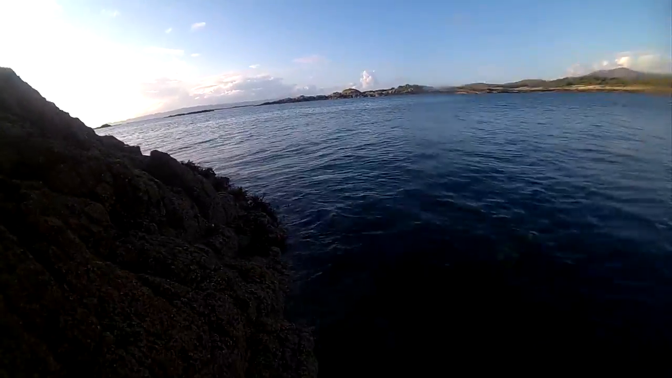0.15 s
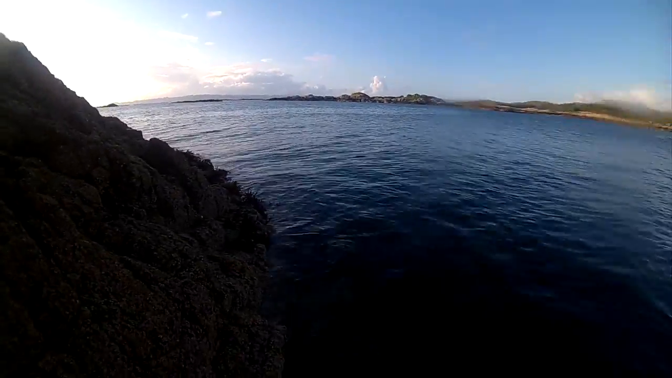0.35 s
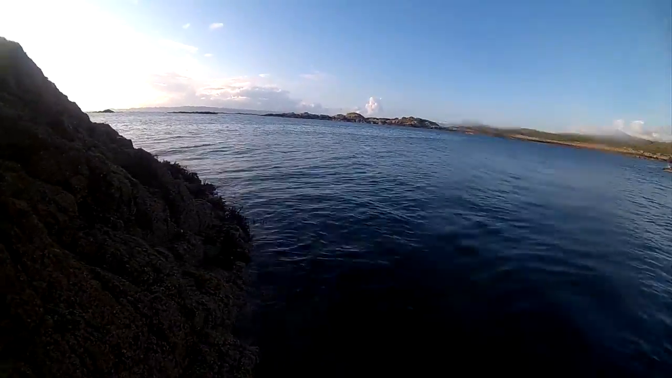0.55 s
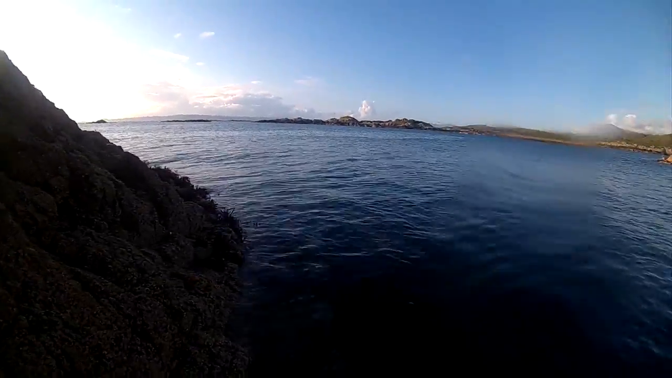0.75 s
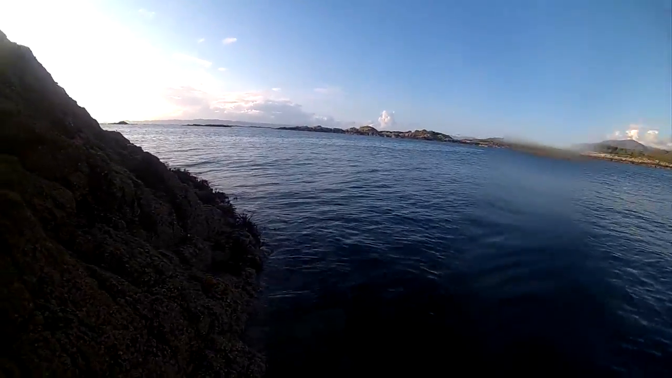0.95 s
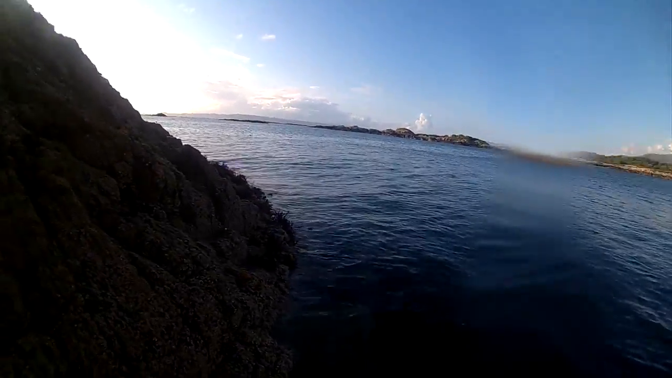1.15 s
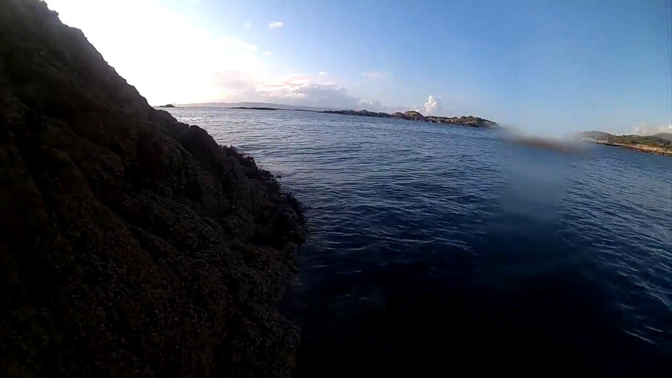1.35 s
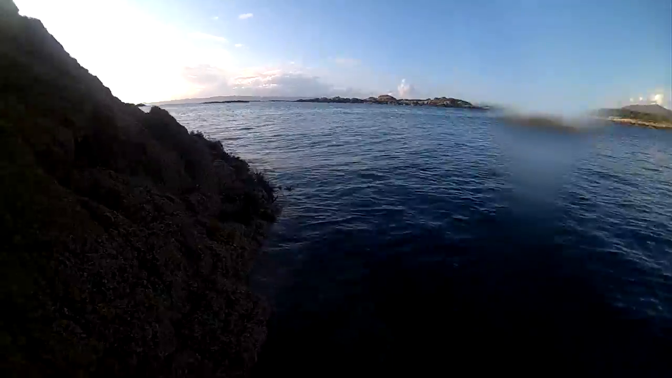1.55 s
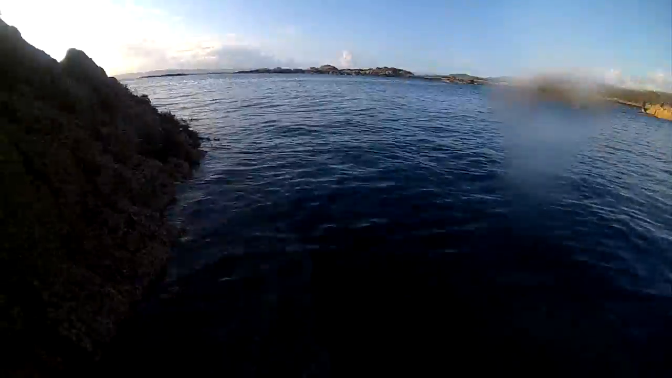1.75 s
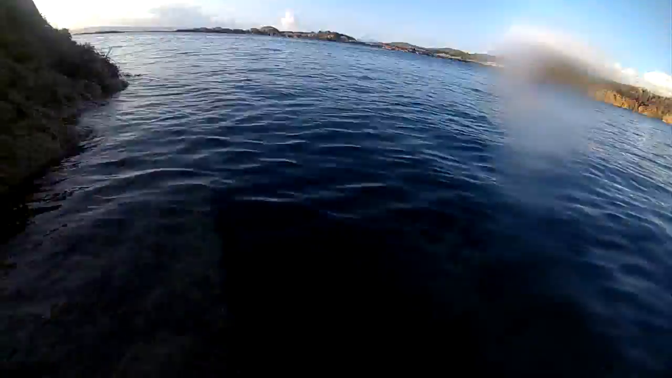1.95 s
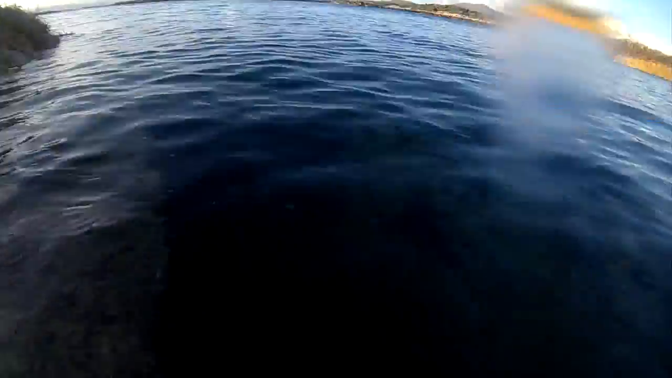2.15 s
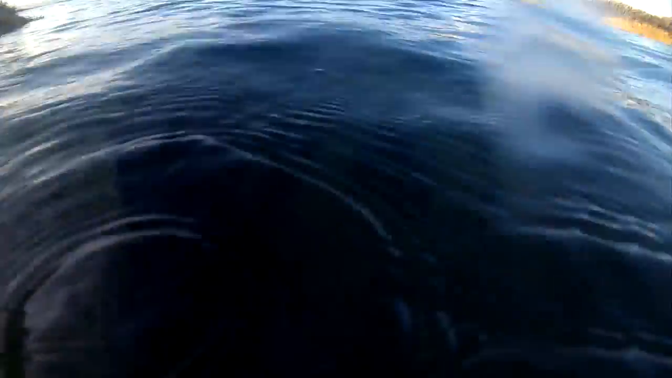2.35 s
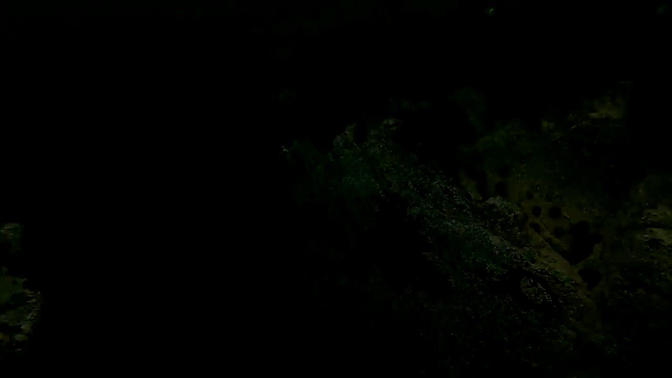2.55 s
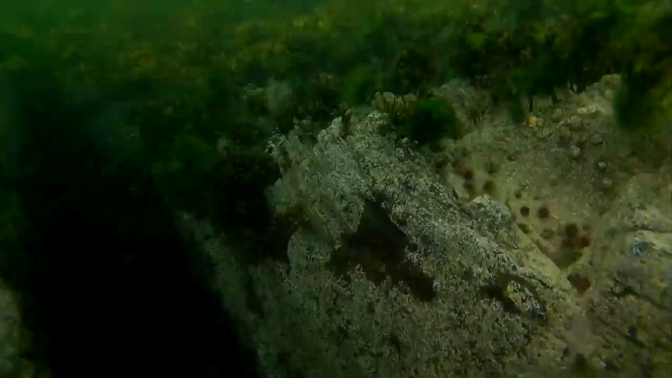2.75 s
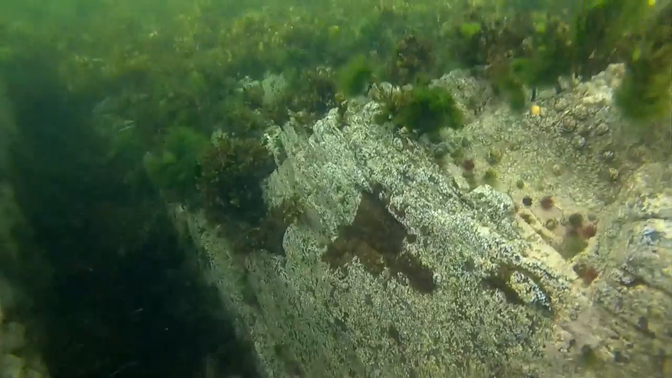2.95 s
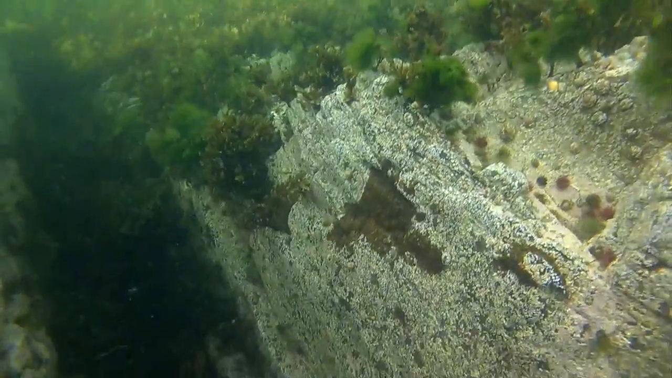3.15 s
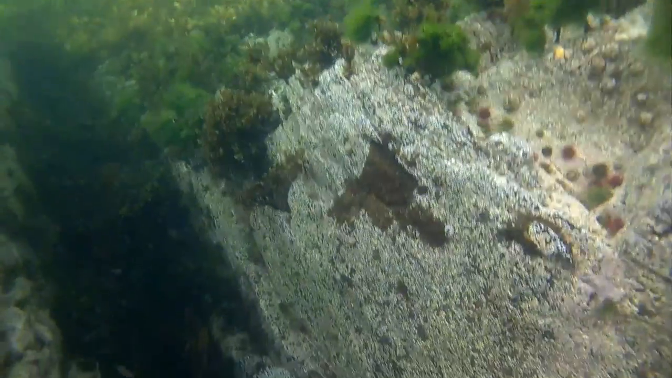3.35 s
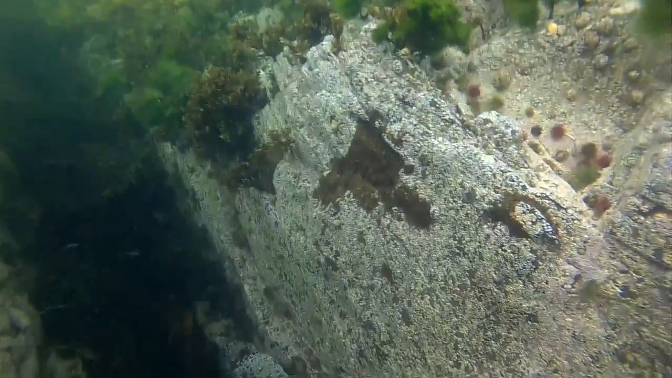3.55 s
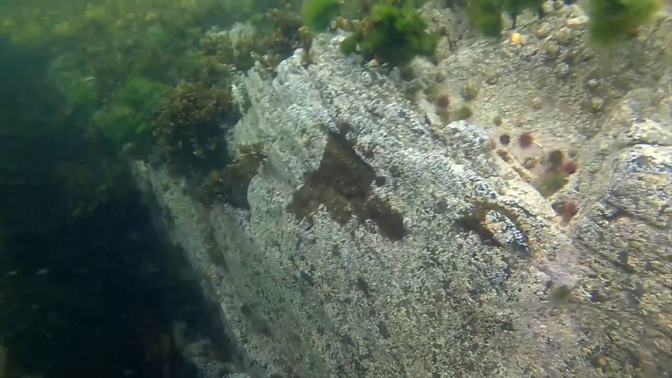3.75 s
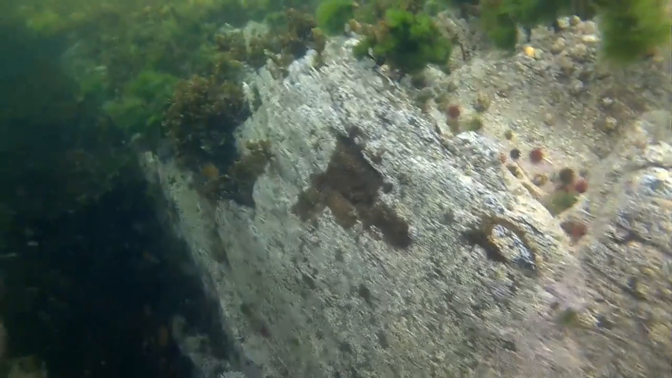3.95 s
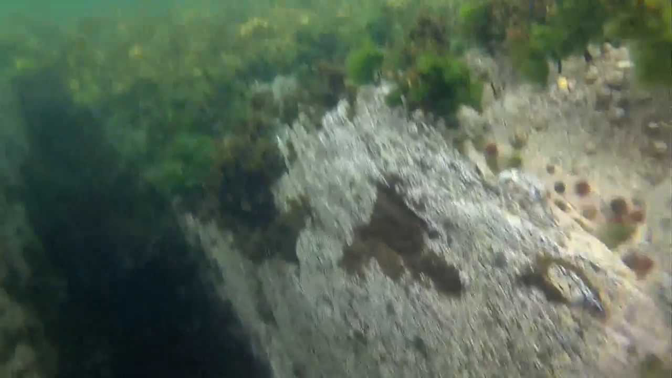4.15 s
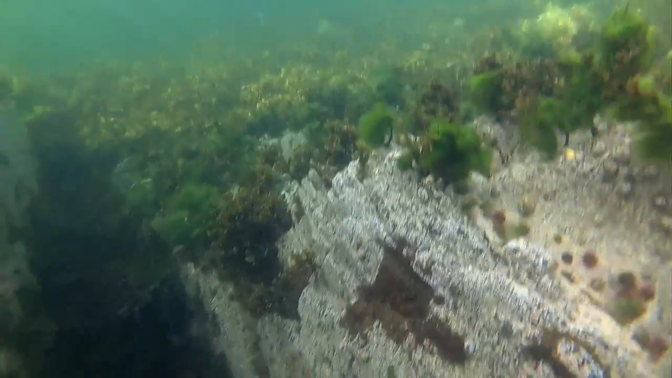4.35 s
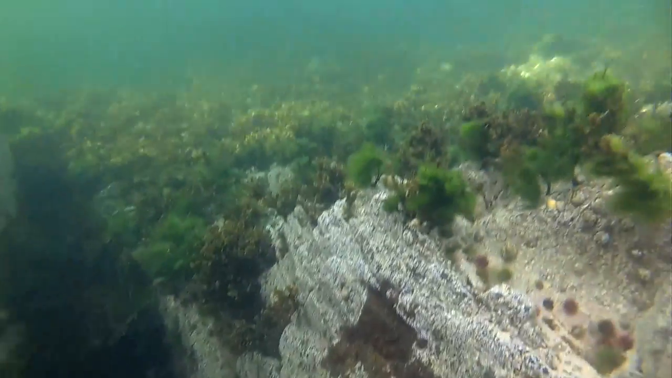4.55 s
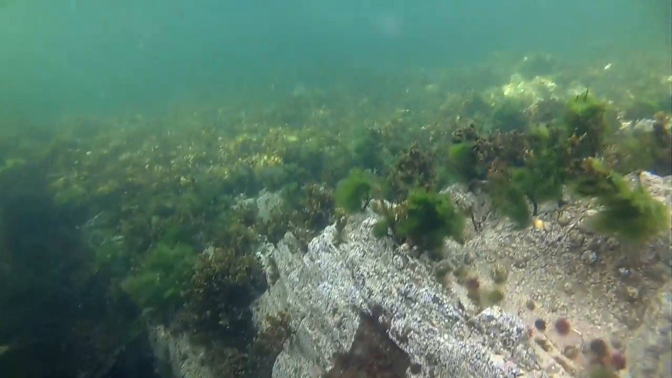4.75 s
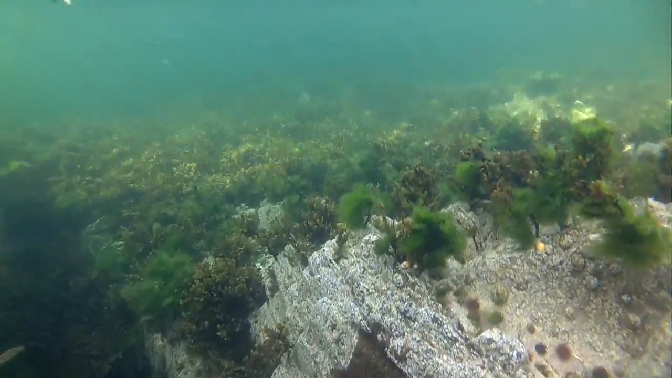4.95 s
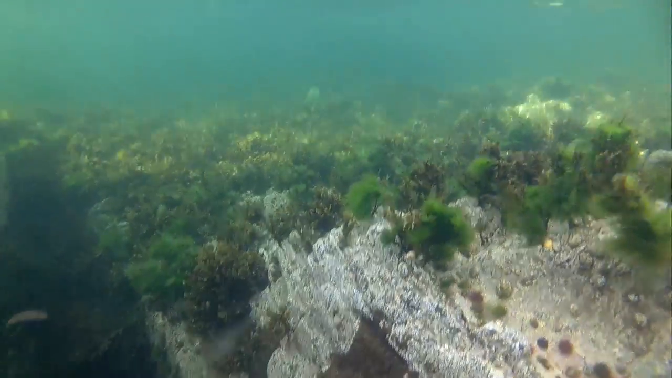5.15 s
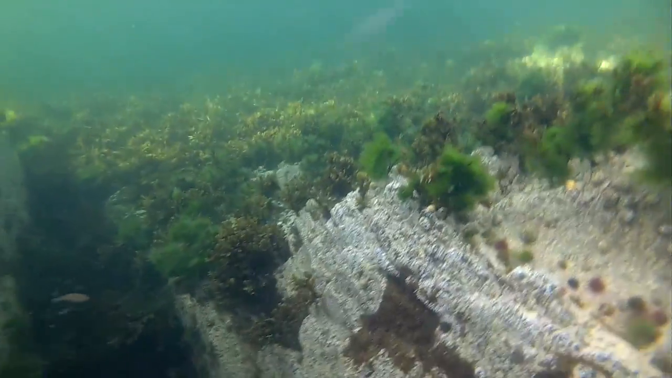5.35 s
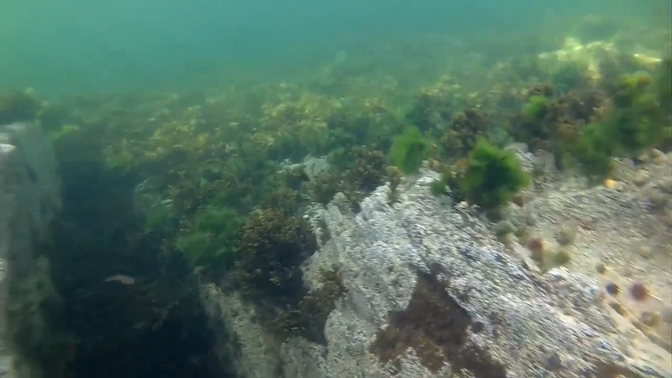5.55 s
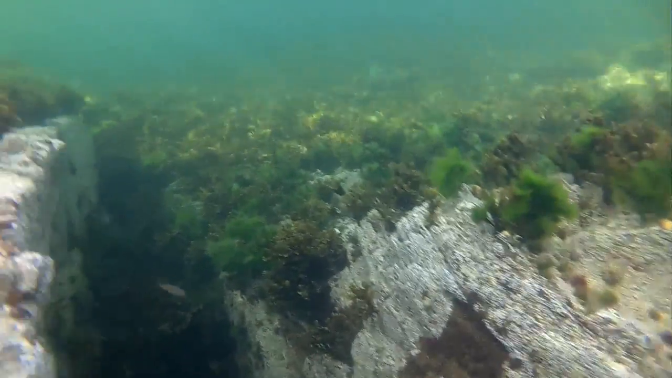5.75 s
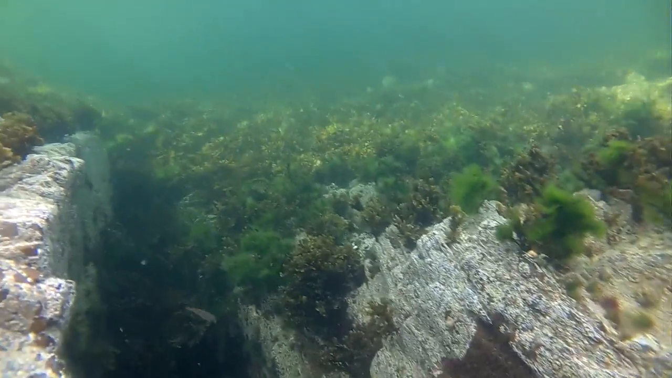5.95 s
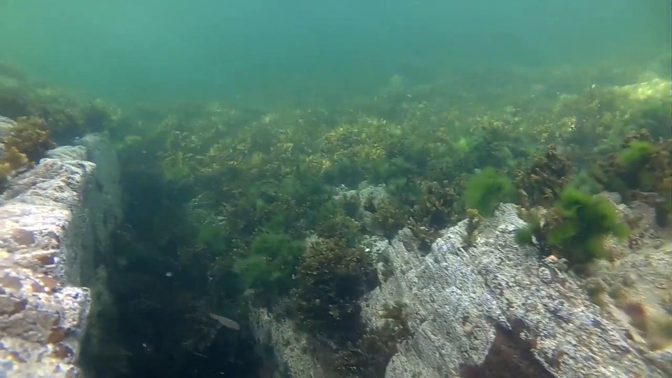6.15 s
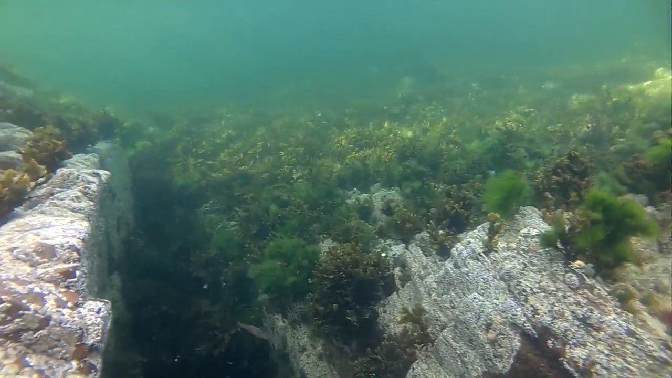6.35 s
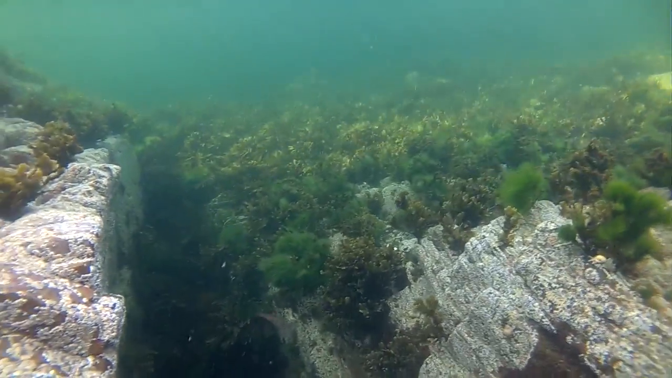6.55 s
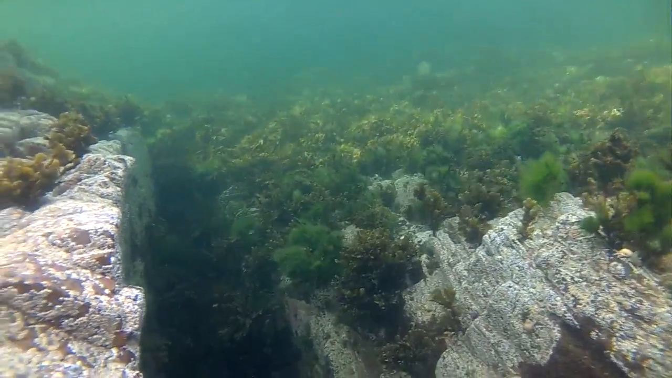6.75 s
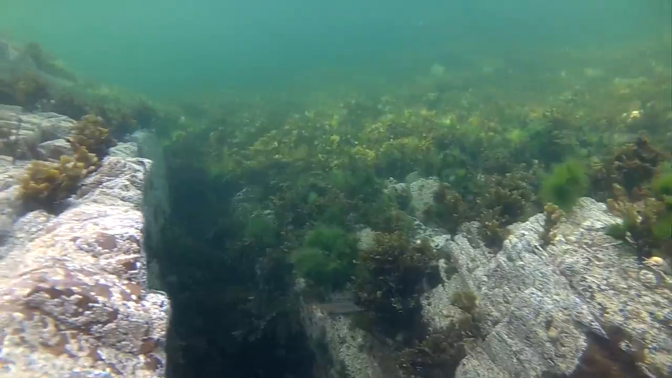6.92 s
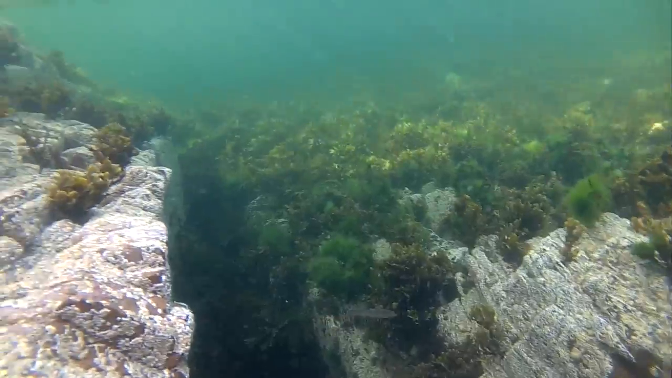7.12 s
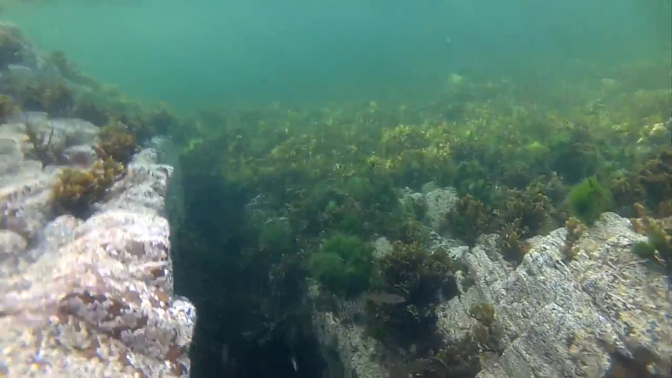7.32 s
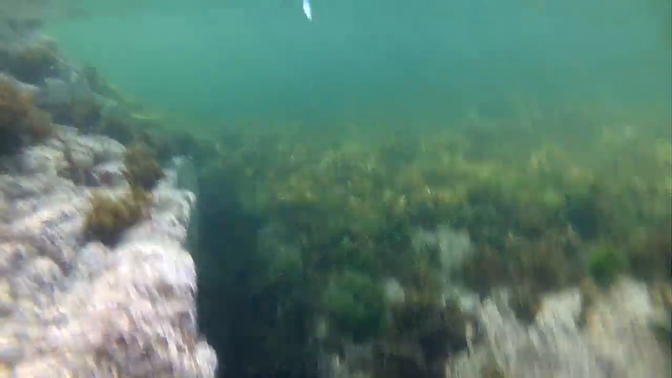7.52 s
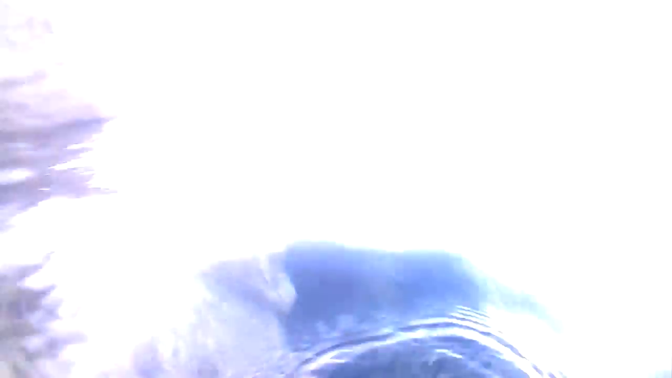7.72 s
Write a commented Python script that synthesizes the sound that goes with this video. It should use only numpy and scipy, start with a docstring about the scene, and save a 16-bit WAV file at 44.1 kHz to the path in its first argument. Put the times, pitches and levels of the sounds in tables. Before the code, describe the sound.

A camera in a plastic shell is dipped into the sea: soft taps, overloaded gulping slaps, hollow knocks and squeaky rubbing, then gurgling at surfacing.

```python
"""Bubbles ring and water slaps and churns round a small camera in a sealed plastic housing,
dipped into the sea by the rocks and lifted out again. Each bubble is a gliding tone, each slap a noise burst.
The hand taps the dry shell, then knocks, slips and rubs on the flooded one, which creaks: clicks ring its modes.
Behind this lie a murmur of drifting noise and, in air, a faint ticking of short pings.
The microphone inside hears it all muffled, and overloads on the loudest sounds."""
import sys
import numpy as np
from scipy import signal
from scipy.io import wavfile
from scipy.ndimage import uniform_filter1d

SR = 44100
rng = np.random.default_rng(int(sys.argv[2]) if len(sys.argv) > 2 else 0)


def generate_wav(signal):
    """Clip the signal to [-1, 1] and save it as 16-bit WAV at the path in sys.argv[1]."""
    frames = np.transpose(np.atleast_2d(signal))
    scaled = np.clip(frames, -1, 1) * 32767
    pcm = np.round(scaled).astype(np.int16)
    wavfile.write(sys.argv[1], SR, pcm)


N = 343098  # length in samples

# The tones of the shell under water. Each row: pitch in Hz, relative level in dB, time to die by 60 dB
# in seconds (before extra damping), relative level in dB when shaken at the grip.
FLOODED_SHELL = [(93, -24, 0.11, -43.5), (215, -10.5, 0.078, -30.5), (326.5, -18.5, 0.13, -46.5),
                 (508.7, -11, 0.14, -25.5), (608.6, -23.5, 0.16, -5), (667.5, 9, 0.031, 0.5),
                 (756, -9, 0.076, 3), (809, -16.5, 0.05, -9), (955, 3.5, 0.044, 0.5),
                 (1279, -8, 0.035, 1.5), (1352, 8, 0.016, 12), (1450, 3.5, 0.014, 15.5),
                 (1666, 0, 0.014, 12.5), (1950, -6.5, 0.016, 11.5), (2232, -15.5, 0.02, 2),
                 (2530, -9.5, 0.0073, 3.5), (2900, -24, 0.0043, -13.5), (3600, -28, 0.004, -20)]


def gain_of(db):
    """Turns decibels into a gain."""
    return 10 ** (np.asarray(db) / 20)


def evened(x):
    """Scales a signal to an rms (average strength) of 1."""
    return x / np.sqrt(np.mean(x ** 2) + 1e-20)


def read(points, hz):
    """Reads a spectrum between its points, on a log-frequency axis."""
    f, value = np.transpose(points)
    return np.interp(np.log(hz + 1), np.log(f + 1), value)


def add(mix, s, sound):
    """Adds a sound to the mix at a time in seconds."""
    part = mix[round(s * SR):][:len(sound)]
    part += sound[:len(part)]


def ring(hz, t60, rise_s, climb=0., settle_s=0.025):
    """A dying sine with a soft start; its pitch glides at first, then settles."""
    t = np.arange(int(1.8 * abs(t60) * SR) + 50) / SR
    glided = t + climb * settle_s * (t - settle_s * (1 - np.exp(-t / settle_s)))
    soft_start = (1 - np.exp(-t / abs(rise_s))) ** 2
    return np.sin(2 * np.pi * hz * glided) * soft_start * gain_of(-60 * t / abs(t60))


def strokes(rows, rise_db_per_s, fall_db_per_s):
    """Level in dB of gestures that swell, hold and fade; the loudest one counts."""
    t = np.arange(N) / SR
    levels = []
    for s, held, db in rows:
        swell_db = rise_db_per_s * np.maximum(s - t, 0)
        fade_db = fall_db_per_s * np.maximum(t - s - held, 0)
        levels.append(db - swell_db - fade_db)
    return np.max(levels, 0)


def bubbles(wobble=0.29):
    """Each pocket of air rings as one tone whose loudness wobbles as the pocket changes shape."""
    # Each row: start in seconds, level in dB, pitch in Hz, time to die by 60 dB in milliseconds,
    # first glide as a share of the pitch per second.
    pockets = [(2.096, -25, 580, 88, 1.5), (2.098, -20, 911, 91, 3), (2.119, -18.5, 1470, 17, -11.5),
               (2.145, -27.5, 3600, 66, -9), (2.148, -21.5, 850, 50, 7), (2.158, -0.5, 2080, 8.5, 6),
               (2.161, -13, 856, 66, 2), (2.16, -19, 1450, 61, -1), (2.181, -1.5, 1580, 14.8, 1.5),
               (2.186, -17, 563, 57, 1.5), (2.189, -20, 2080, 27, 6), (2.232, -22.5, 1950, 56, 1),
               (2.236, -27.5, 4400, 19, -4), (2.243, -17.5, 2126, 23, -3.5), (2.267, -14.5, 1700, 27, 12.5),
               (2.311, -30, 899, 62, 6.5), (2.324, 18.5, 1784, 6.7, 0.5), (2.334, -2.5, 3130, 11.4, 3),
               (2.335, -26, 620, 116, 10.5), (2.367, -15.5, 1345, 35, -1.5), (2.357, -19, 1837, 63, 3.5),
               (2.418, -25, 950, 16, 4.5), (2.43, -9, 2110, 13, 5), (2.436, -25, 933, 58, 3),
               (2.486, -11.5, 1094, 16.5, 46), (2.488, -11.5, 1398, 49, -0.5), (2.529, -39, 1020, 43, -7),
               (2.446, -31, 1950, 37, -8), (2.557, -17.5, 1155, 94, 5), (2.611, -46, 2436, 31, 1),
               (2.618, -27.5, 984, 20, -3.5), (2.653, -38.5, 1043, 61, 5), (2.681, -45, 988, 75, -2),
               (2.701, -21.5, 950, 5.3, 6), (2.737, -21, 968, 39, 0.5), (2.768, -28.5, 328, 81, -11.5),
               (2.78, -19, 993, 47, 1.5), (2.781, -21, 774, 51, 1), (2.825, -21.5, 763, 56, 2.5),
               (2.829, -29.5, 1257, 47, 7), (3.646, -18, 934, 53, -1.5), (3.646, -21.5, 1335, 38, 6),
               (3.647, -20.5, 720, 48, 9), (3.915, -13, 955, 23, 0.5), (3.918, -25.5, 1110, 66, 6.5),
               (6.052, -48.5, 959, 81, 0), (6.361, -48.5, 930, 52, 1), (2.108, -23, 4150, 30, -3.5),
               (7.381, -24.5, 1080, 13, -18), (7.413, -37.5, 2000, 17, 5), (7.415, -29, 880, 24, -6),
               (7.467, 8.5, 1292, 20.6, -17), (7.4737, -12.5, 1122, 64, -8), (7.543, -6.5, 2850, 8.4, 1.5),
               (7.546, -22, 810, 59, -1), (7.565, -27, 4740, 17, -6), (7.5783, -21.5, 840, 160, 3.5),
               (7.5775, -24, 737, 280, 2.5), (7.496, -31.5, 1910, 38, -2), (7.613, -23.5, 2730, 26, -7),
               (7.615, -27, 1930, 13, 2), (7.645, -31, 1000, 27, -12.5), (7.706, -27.5, 1950, 13, 1.5),
               (7.712, -36, 673, 124, -1)]
    out = np.zeros(N)
    noise = rng.standard_normal(2 * SR)
    shape = evened(uniform_filter1d(uniform_filter1d(noise, size=150), size=150))
    for (s, db, hz, t60_ms, climb), start in zip(pockets, rng.integers(0, SR, 99)):
        tone = ring(hz, t60_ms / 1000, 0.48 / hz, climb)
        add(out, s, gain_of(db) * tone * (1 + wobble * shape[start:start + len(tone)]))
    return out


def slaps(t60=0.0089, ping_hz=4200, ping_t60=0.053, ping_db=-46):
    """Water slaps are short bursts of noise without much bass or treble; each leaves a thin high ping."""
    # Each row: start in seconds, level in dB before the filter and the final gain.
    hits = [(2.096, -29.5), (2.1, -20.5), (2.11, -28.5), (2.118, -30), (2.16, -22.5), (2.182, -20),
            (2.235, -31), (2.268, -31.5), (2.314, -35), (2.331, -14), (2.354, -4.5), (2.365, -5.5),
            (2.4, -20), (2.428, -33), (2.46, -46), (2.486, -26), (2.7311, -33), (2.736, -29.5),
            (2.784, -20), (2.815, -39.5), (2.82, -28.5), (7.381, -43.5), (7.542, -27.5), (7.631, -40.5),
            (7.659, -49), (7.67, -31), (7.688, -41)]
    out = np.zeros(N)
    t = np.arange(3000) / SR
    for s, db in hits:
        fading = gain_of(db - 60 * t / t60) * (1 - np.exp(-t / 0.00006))
        add(out, s, fading * rng.standard_normal(len(t)))
    band = signal.butter(2, [150. / SR * 2, 3800. / SR * 2], "bandpass")
    out = signal.lfilter(*band, out)
    ping = signal.oaconvolve(out, ring(ping_hz, ping_t60, 1 / ping_hz))[:N]
    return gain_of(14.0) * (out + gain_of(ping_db) * ping)


def churn(per_s=2600, uneven_db=3.0, count=24, tilt_db=4.0, dulling_db=1.0, loud_db=-37.5):
    """A dense swarm of small, quickly damped bubbles; low ones ring longer, and calm water sounds duller."""
    # Surges at the surface. Each row: start in seconds, time held in seconds, level in dB before shaping.
    surges = [(2.092, 0.11, -47), (2.17, 0.067, -44.5), (2.33, 0.026, -42), (2.7, 0.1, -50),
              (2.8, 0.024, -57), (7.365, 0.06, -50.5), (7.515, 0.053, -46.5), (7.62, 0.045, -43.5),
              (7.71, 0.024, -48.5)]
    level_db = strokes(surges, rise_db_per_s=1493.5, fall_db_per_s=298)
    uneven = gain_of(uneven_db * np.minimum(rng.exponential(1, N), 3))
    clicks = evened((rng.random(N) < per_s / SR) * uneven) * gain_of(level_db)
    slope_db = tilt_db + dulling_db * np.clip(level_db - loud_db, -30, 0)  # per octave above 800 Hz
    kind = rng.integers(0, count, N)  # which pitch each bubble has
    out = np.zeros(N)
    for k, hz in enumerate(np.geomspace(560., 4000., count)):
        tilted = gain_of(slope_db * max(np.log2(hz / 800), 0) - 13.0)
        out += signal.oaconvolve(clicks * (kind == k) * tilted, ring(hz, 40.0 / hz, 0.3 / hz))[:N]
    return out


def scattered(x, t60=0.026, level_db=-9.5):
    """Neighbouring bubbles and the shell throw each sound back as a short rough tail."""
    t = np.arange(4000) / SR
    tail = rng.standard_normal(4000) * gain_of(-60 * t / t60) * (t > .002)
    return x + gain_of(level_db) * signal.oaconvolve(x, tail / np.linalg.norm(tail))[:N]


def struck(modes, clicks, hardness_db, scatter_db, damping=1):
    """Every click rings every mode, harder clicks favouring the high ones, each a little differently."""
    out = np.zeros(N)
    for hz, db, t60, *_ in modes:
        octaves = np.log2(np.clip(hz, 500, 3000) / 800)
        share_db = db + hardness_db * octaves + scatter_db * rng.standard_normal(N)
        tone = ring(hz, t60 / damping, 0.0024 / damping)
        out += signal.oaconvolve(clicks * gain_of(share_db), tone)[:N]
    return out


def blows(modes, rows, level_db, scatter_db=1, damping=1):
    """Single clicks ring one set of modes, each click with its own level and perhaps hardness."""
    clicks, hardness_db = np.zeros(N), np.zeros(N)
    for s, db, *hard in rows:
        at = round(s * SR)
        clicks[at] = gain_of(db + level_db)
        hardness_db[at] = sum(hard)  # 0 where none is given
    return struck(modes, clicks, hardness_db, scatter_db, damping)


def knocks_and_single_slips():
    """Knocks, and a few single slips of the grip, set the flooded shell ringing."""
    # Each row: time in seconds, level in dB before the overall level, hardness in dB per octave.
    hits = [(3.073, -31.5, -3), (3.1075, -38, -8.5), (3.1078, -11.5, 4.5), (3.189, -24, 2.5),
            (3.201, -26, 6.5), (3.301, -30.5, 4), (3.438, -34, -1), (3.496, -43.5, 18), (3.855, -39.5, -3),
            (4.034, -48, 8), (4.105, -38.5, 6), (4.7435, -4.5, -0.5), (4.771, -24, 5.5),
            (4.783, -16.5, -3.5), (4.973, -10, 2), (4.99, -6.5, 5), (5.005, -10.5, -2.5),
            (5.152, -35, -2.5), (5.266, -33, 6), (5.558, -36, -14.5), (5.575, -35, -13), (7.039, -12.5, 4),
            (7.457, -25, -1.5)]
    return blows(FLOODED_SHELL, hits, -6.5, damping=1.076)


def creak_slips(jitter=0.05, scatter_db=0.5):
    """Times and levels of the slips in each creak, nearly evenly spaced."""
    # Each row: start in seconds, length in seconds, slips per second, level in dB before scatter.
    runs = [(3.244, .05, 92, -37), (3.975, .03, 76, -45), (4.045, 0.04, 118, -40.5),
            (4.125, 0.078, 112, -45), (5.181, .022, 150, -40), (5.207, .035, 97, -41),
            (7.231, .01, 128, -39.5), (7.25, .03, 40, -34.5), (7.302, .033, 106, -31),
            (7.344, .016, 77, -32.5)]
    rows = []
    for s, length, per_s, db in runs:
        late, size = rng.standard_normal((40, 2)).T
        at = (np.arange(40) + jitter * late) / per_s
        rows += [(s + a, db + scatter_db * b) for a, b in zip(at, size) if a < length]
    return rows


def creaks():
    """The grip slips in quick steps and rings the shell from the grip; the tight grip damps the ringing."""
    gripped = [(hz, grip_db, t60) for hz, _, t60, grip_db in FLOODED_SHELL]
    return blows(gripped, creak_slips(), -1.7, damping=1.805)


def rubbing(slips_per_s=2500, uneven_db=2.0, hardness_db=10.0, per_db=1.14):
    """Wet skin drags in many tiny unequal slips that shake the flooded shell; a firmer drag sounds harder."""
    # Each row: start in seconds, time held in seconds, level in dB.
    drags = [(3.1, 0.075, -44), (3.26, 0.051, -46.5), (3.5, 0.035, -45), (3.62, 0.14, -52),
             (3.9, 0.087, -49.5), (4.045, 0.037, -47.5), (4.13, 0.07, -46.5), (4.6, 0.096, -51.5),
             (4.78, 0.17, -37.5), (5.15, 0.077, -56), (7.21, 0.19, -54)]
    level_db = strokes(drags, rise_db_per_s=589.5, fall_db_per_s=490.5)
    size = gain_of(uneven_db * rng.exponential(1, N)) * rng.choice([-1., 1.], N)
    tiny_slips = (rng.random(N) < slips_per_s / SR) * size
    hard_db = hardness_db + per_db * (np.maximum(level_db, -60) + 35.5)
    shaken = struck(FLOODED_SHELL, tiny_slips, hard_db, 0.98)
    local_rms = np.sqrt(uniform_filter1d(shaken ** 2, size=6000) + 1e-12)
    return gain_of(level_db) * shaken / local_rms


def hollowed(x):
    """Cuts the narrow dips where neighbouring modes of the flooded shell cancel."""
    # Each row: centre in Hz, width in Hz.
    notches = [(1090, 200), (1800, 120)]
    for hz, width_hz in notches:
        x = signal.lfilter(*signal.iirnotch(hz, hz / width_hz, SR), x)
    return x


def taps():
    """Finger taps ring the dry shell."""
    # The shell in air. Each row: pitch in Hz, relative level in dB, time to die by 60 dB in seconds.
    dry_modes = [(252, 0, 0.012), (620, -18, 0.059), (753, -2, 0.026), (1400, -11, 0.018),
                 (1880, 12.5, 0.0039)]
    # Each row: time in seconds, level in dB before the overall level.
    hits = [(0.69, -48), (0.885, -51.5), (0.907, -48.5), (0.935, -46.5), (1.234, -47), (1.39, -49),
            (1.651, -51.5), (1.682, -51), (1.726, -42), (1.741, -46.5), (1.831, -44), (1.914, -38),
            (2.044, -39), (2.066, -44.5)]
    return blows(dry_modes, hits, 12.3)


def murmur(patchy_db=3.23, level_db=-61):
    """Muffled sea and circuit noise: steady noise whose short-time spectrum drifts in patches."""
    # Each row: frequency in Hz, relative level in dB per Hz.
    spectrum = [(20, 1.5), (60, -15), (130, -7), (250, 0.5), (420, -6.5), (620, 0.5), (800, 2.5),
                (1100, -3), (1600, -9.5), (2200, -10), (3000, -17.5), (5000, -19)]
    frames, hz = N // 128 + 9, np.fft.rfftfreq(512, 1 / SR)
    a, b, patches = rng.standard_normal((frames, 257, 3)).T
    patches = uniform_filter1d(patches, size=6, axis=0)  # smooth over frequency, then time
    patches = evened(uniform_filter1d(patches, size=14, axis=1))
    z = (a + 1j * b) * gain_of(read(spectrum, hz)[:, None] + patchy_db * patches)
    noise = signal.istft(z, nperseg=512, noverlap=384)[1][:N]
    return gain_of(level_db) * evened(noise)


def ticking(level_db=-57.5, round_s=.1, end_s=2):
    """A faint, even ticking while in air: three short pings in each round."""
    # Each row: first time in seconds, pitch in Hz.
    pings = [(.012, 3300), (.045, 2500), (.079, 3300)]
    out = np.zeros(N)
    for first_s, hz in pings:
        for s in np.arange(first_s, end_s, round_s):
            add(out, s, gain_of(level_db) * ring(hz, 0.018, 0.00058))
    return out


def scene():
    """Adds up the water, the hand on the shell, the murmur and the ticking, as one channel."""
    water = scattered(bubbles() + slaps() + churn())
    hand = hollowed(knocks_and_single_slips() + creaks() + rubbing()) + taps()
    return (water + hand + murmur() + ticking())[None]


def record(dry, overload_db=-16.5, hiss_db=-98, edge_hz=15630):
    """The capsule overloads, the sealed cavity muffles it, the converter adds hiss; then the band limit."""
    # What the sealed microphone passes. Each row: frequency in Hz, level in dB.
    muffle = [(20, -39), (70, -15), (200, -13), (500, -3.5), (1250, 0.5), (1750, -3), (2500, -14.5),
              (4400, -24), (5100, -46), (6900, -51), (8500, -32.5), (12000, -32.5), (14500, -52.5)]
    limit = gain_of(overload_db)
    clipped = dry / (1 + np.abs(dry / limit) ** 8) ** (1 / 8)
    log_gain = np.log(gain_of(read(muffle, abs(np.fft.fftfreq(8192, 1 / SR)))))
    # minimum phase: the filter answers as early as it can
    causal = np.fft.ifft(np.exp(np.conj(signal.hilbert(log_gain)))).real[:4096]
    muffled = signal.oaconvolve(clipped, causal[None])[:, :N]
    heard = muffled + gain_of(hiss_db) * rng.standard_normal(dry.shape)
    low_pass = signal.firwin(511, edge_hz, window=("kaiser", 9), fs=SR)
    return signal.oaconvolve(heard, low_pass[None], "same")


dry = scene()
out = record(dry)
generate_wav(out)
```